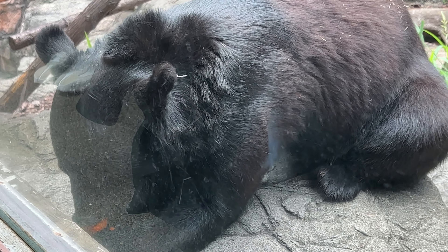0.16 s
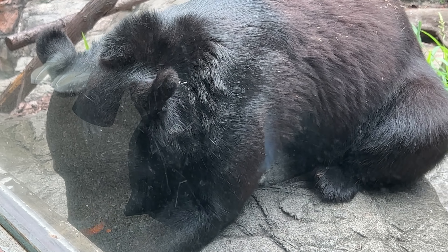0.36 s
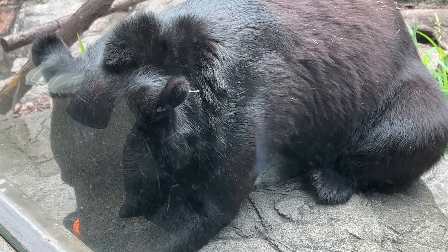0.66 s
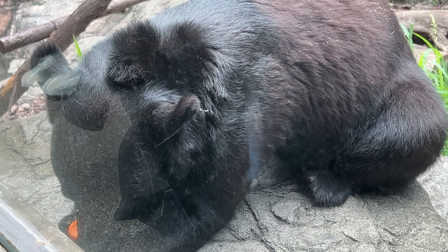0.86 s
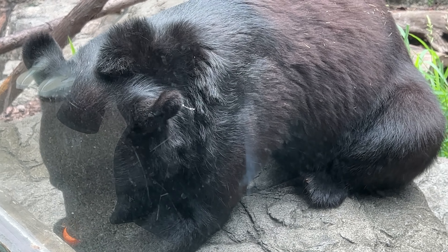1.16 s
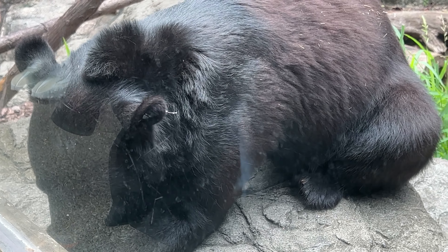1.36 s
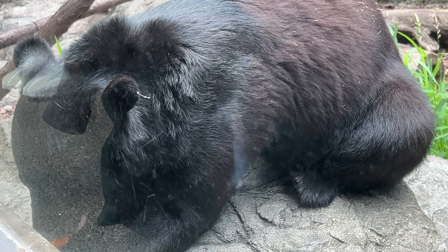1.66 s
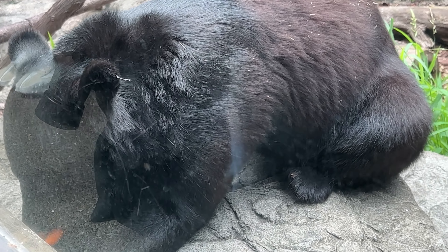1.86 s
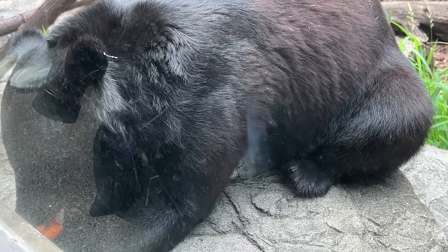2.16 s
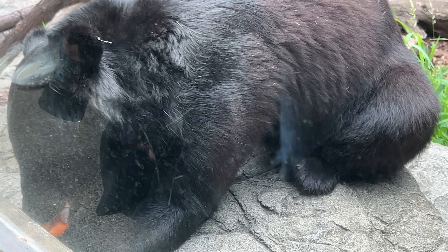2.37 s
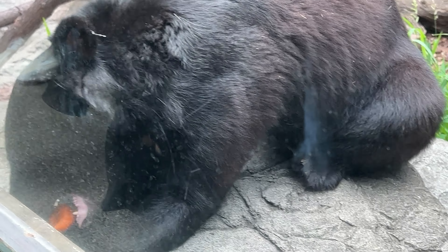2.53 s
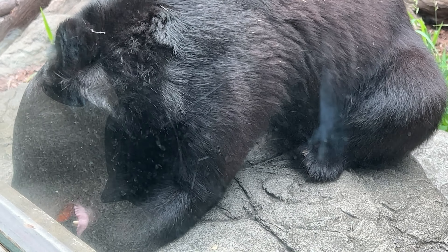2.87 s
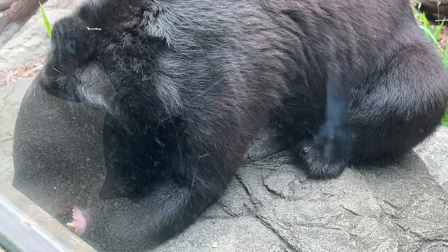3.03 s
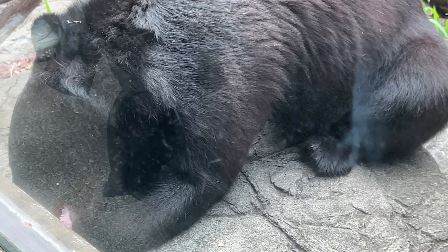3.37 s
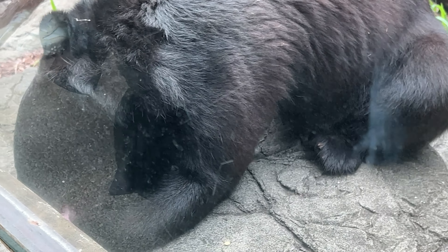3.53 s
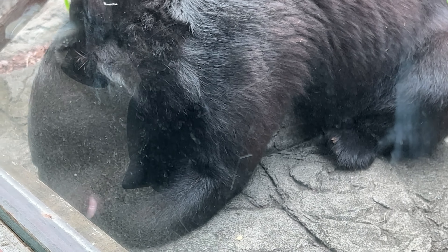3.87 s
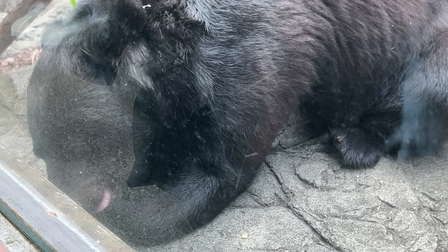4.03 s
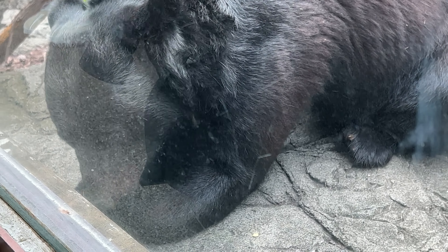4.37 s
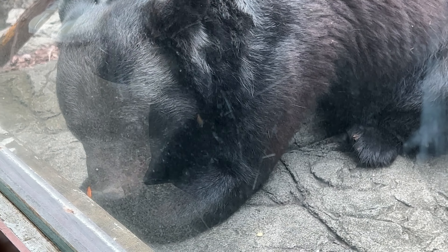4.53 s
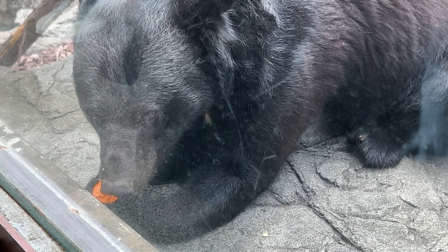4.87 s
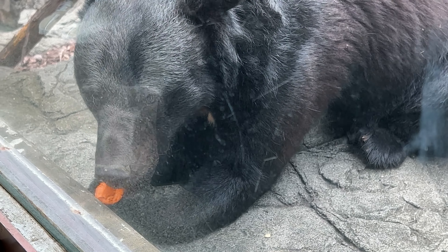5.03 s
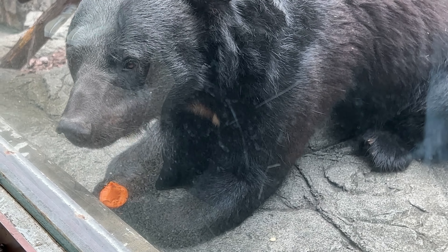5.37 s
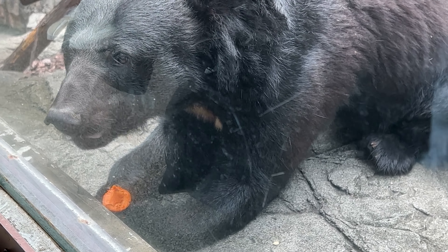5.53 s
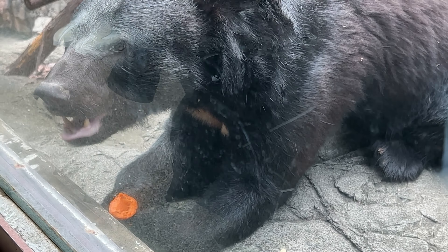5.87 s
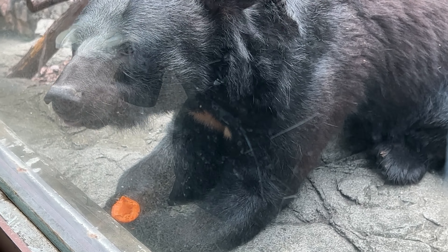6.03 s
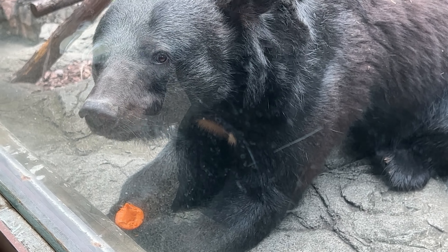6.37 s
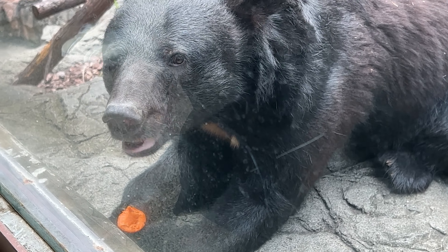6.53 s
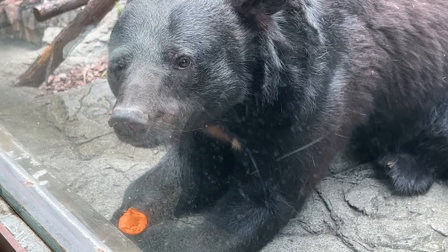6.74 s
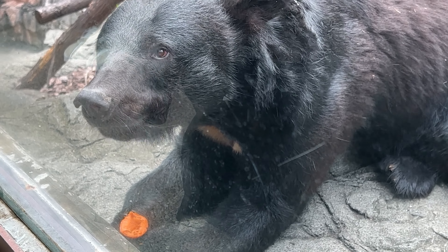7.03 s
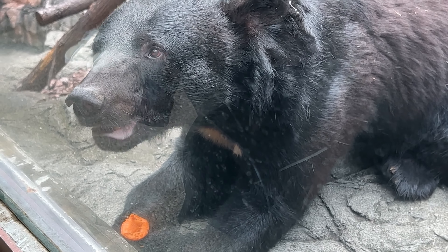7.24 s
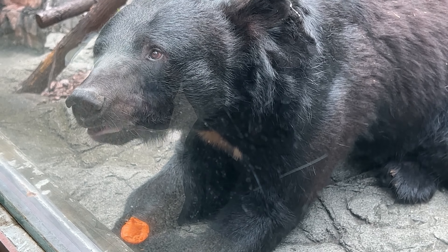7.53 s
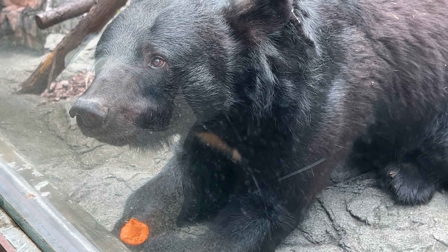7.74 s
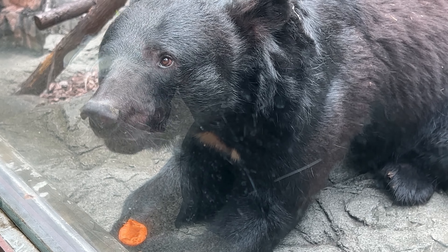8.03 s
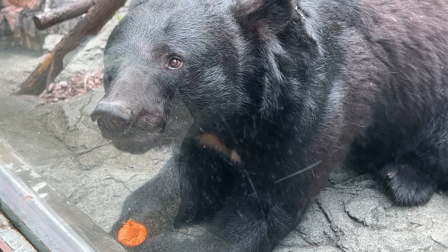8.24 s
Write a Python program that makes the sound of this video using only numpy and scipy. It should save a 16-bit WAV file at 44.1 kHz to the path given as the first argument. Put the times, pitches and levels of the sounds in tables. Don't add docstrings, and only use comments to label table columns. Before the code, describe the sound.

Stereo microphones in a hall capture a deep, constant machine hum with faint fan tones behind it. A tiny far squeak, dry clicks and soft buzzing cicada calls come and go. The machine then stops suddenly with low bumps, a brief cover rattle, small metallic pings and a cluster of rough air puffs. The remainder is quiet: soft room rush, high insect hiss, wavering whistles and longer cicada notes.

```python
import sys
import numpy as np
from scipy import signal
from scipy.fft import rfft, irfft
from scipy.io import wavfile

SR = 44100
rng = np.random.default_rng(int(sys.argv[2]) if len(sys.argv) > 2 else 0)


def to_wav(s):
    ch = np.atleast_2d(s).T
    pcm = np.round(np.clip(ch, -1, 1) * 32767)
    wavfile.write(sys.argv[1], SR, pcm.astype(np.int16))


def convert_level_to_amplitude(level_db):
    exponent = np.asarray(level_db, float) / 20
    return 10 ** exponent


N = 370440
T = np.arange(N) / SR
HZ = np.maximum(np.arange(N // 2 + 1) * SR / N, 1)
CUT_OUT_S = 5.375


def rms_one(x):
    return x / np.sqrt(np.mean(x ** 2) + 1e-20)


def in_time(rows):
    s, *columns = np.transpose(rows)
    return [np.interp(T, s, column) for column in columns]


def at_hz(points):
    hz, value = np.transpose(points)
    return np.interp(np.log(HZ), np.log(hz), value)


def window(s, length, fade=0.032):
    return np.clip(np.minimum(T - s, s + length - T) / fade, 0, 1)


def swell(s, db, hold, rise, fall):
    early = np.maximum(s - T, 0)
    late = np.maximum(T - s - hold, 0)
    return convert_level_to_amplitude(db - rise * early - fall * late)


def drift(rate):
    step = 40
    r = np.exp(-2 * np.pi * step * rate / SR)
    draws = rng.standard_normal(N // step + 2002)
    slow = signal.lfilter([1], [1, -2 * r, r * r], draws)[2000:]
    return np.interp(np.arange(N) / step, np.arange(len(slow)), rms_one(slow))


def peaks(rows):
    power = 0
    for hz, width, db in rows:
        power = power + convert_level_to_amplitude(2 * db) / (1 + ((HZ - hz) / (0.41 * width)) ** 2) ** 2
    return np.sqrt(power)


# frequency in Hz, likeness from 0 to 1.
EAR_LIKENESS = [(25, .999), (70, .997), (130, .96), (290, .6), (640, .2), (1000, .1), (1500, .35),
                (2000, .97), (3500, .92), (6000, .99), (8000, .94), (16000, .94)]
# frequency in Hz, left-right difference in dB.
EAR_LEAN = [(200, 0), (700, 1.5), (1400, -2.5), (2100, 1.5), (16000, -0.5)]


def diffuse(gain):
    alike = np.clip(at_hz(EAR_LIKENESS), 0, 1)
    mid, side = rfft(rng.standard_normal((2, N)))
    both = np.sqrt(1 + alike) * mid + np.sqrt(1 - alike) * side * [[1], [-1]]
    lean = convert_level_to_amplitude(at_hz(EAR_LEAN) * [[.5], [-.5]])
    return rms_one(irfft(both * gain * lean, N))


def tone(cycles, db, lean_db=0, lead=0):
    phase = 2 * np.pi * (cycles + rng.random()) + np.array([[lead / 2], [-lead / 2]])
    lean = convert_level_to_amplitude(lean_db * np.array([[.5], [-.5]]))
    return np.sqrt(2) * convert_level_to_amplitude(db) * lean * np.sin(phase)


def struck(rows):
    out, age = np.zeros(N + SR), T[:SR]
    for s, hz, db, swell_s, t60 in rows:
        start = int(s * SR)
        envelope = convert_level_to_amplitude(db - 60 * age / t60) * (1 - np.exp(-age / swell_s))
        out[start:start + SR] += envelope * np.sin(2 * np.pi * hz * age)
    return out[:N]


def sung(s, length, start, end, db):
    peak = .6
    share = np.clip((T - s) / length, 0, 1)
    arch_db = 12 * ((share - peak) / peak) ** 2
    pitch = start + (end - start) * np.sin(share * np.pi / 2)
    return pitch, convert_level_to_amplitude(db - arch_db) * window(s, length)


# frequency in Hz, level in dB, left-right difference in dB.
MAINS_HUM = [(99.81, -24.3, -.3), (199.8, -55, 2)]
# multiple of its speed, level in dB, left-right difference in dB,
# left ear's lead in radians.
SHAFT_ORDERS = [(3, -47, 0, 0.1), (5, -62, 2, -0.1), (6, -48, -4, -0.2), (7, -63, -1, -0.1),
                (9, -46, -6, 0.9), (10, -57, 1, -0.1), (11, -59, -7, 1.1), (12, -39, -4, 0.2),
                (13, -58, -3, 0.6), (14, -58, 3, 0.4), (15, -58, -2, 1.6), (16, -61, 10, -0.4),
                (18, -63, 16, 0.0), (20, -66, 14, -1.4), (23, -67, 0, -1.4), (24, -61, -3, -2.7),
                (26, -66, 0, 0.6), (27, -67, -9, 1.3)]
# frequency in Hz,
# level in dB, left-right difference in dB.
HOUSING_TONES = [(48.1, -61, 0), (76.7, -53, 0), (128.5, -63, 0), (246.7, -63, 0), (320.2, -53, 5),
                 (393.7, -63, 0), (587.7, -60, -12), (489.6, -63, 8)]
# frequency in Hz, level in dB per Hz.
RUMBLE_COLOUR = [(15, -55), (28, -30), (45, -8), (62, 0), (100, -8), (130, -9.5), (170, -7), (260, -16),
                 (400, -17), (700, -25.5), (1100, -37), (1600, -73)]
# time in seconds, level in dB, hold in seconds, rise and fall in dB per second.
LURCH = (5.5, -32.5, -0.03, 115, 40)
# frequency in Hz, width in Hz, level in dB.
COVER_MODES = [(174, 58, 1), (259, 62, -2), (339, 67, -7), (486, 95, -8.5), (890, 620, -25)]
# time in seconds, level in dB, hold in seconds,
# rise and fall in dB per second.
COVER_RATTLE = (5.5, -43.5, 0.4, 130, 9)


def compressor():
    off = np.maximum(T - CUT_OUT_S, 0)
    speed = np.maximum(1 - 1.75 * off, 0)
    wobble = 0.00021 + 0.047 * (1 - speed)
    shaft_hz = 24.487 * speed
    turns = np.cumsum(shaft_hz * (1 + wobble * drift(11))) / SR
    shaft = sum(tone(k * turns, db + .5 * drift(1.3), lean, lead) for k, db, lean, lead in SHAFT_ORDERS)
    housing = sum(tone(hz * T, db + 0.69 * drift(5.8), lean) for hz, db, lean in HOUSING_TONES)
    shaft_fade = convert_level_to_amplitude(0.53 - 520 * np.minimum(off, 1) ** 2)

    mains = sum(tone(hz * T, db + 0.14 * drift(3.8), lean, .07) for hz, db, lean in MAINS_HUM)
    beating_db = 3.5 * (np.cos(2 * np.pi * 14.4 * off) - np.exp(-off / .05))
    mains_fade = swell(CUT_OUT_S, 0, 0.061, 0, 73) * convert_level_to_amplitude(beating_db)

    running = swell(CUT_OUT_S, -52, 0, 0, LURCH[-1])
    rumble = (running + swell(*LURCH)) * diffuse(convert_level_to_amplitude(at_hz(RUMBLE_COLOUR)))
    settling = swell(6.2, 0, 0, 0, 56)
    rattle = swell(*COVER_RATTLE) * settling * convert_level_to_amplitude(0.81 * drift(25)) * diffuse(peaks(COVER_MODES))
    return shaft_fade * (shaft + housing) + mains_fade * mains + rumble + rattle


# time in seconds, rms level in dB, hold in seconds,
# rise and fall in dB per second.
MOUNT_SHUDDER = (5.545, -25, .075, 190, 240)
# start in seconds, frequency in Hz, peak in dB, swell in seconds,
# 60 dB decay in seconds.
MOUNT_BUMPS = [
    (5.64, 67.6, -27, .02, .3),
    (5.39, 210, -27, .03, 0.25),
    (5.505, 75.3, -11.5, 0.013, 0.15),
    (5.82, 60, -32, .03, 0.39),
    (5.96, 70, -36, .02, .2),
    (6.37, 59, -31, 0.044, 0.49),
    (4.1, 50, -40, .03, .3),
    (8.2, 60, -38, 0.028, 0.34),
]
# start in seconds, frequency in Hz, peak in dB.
PIPE_PINGS = [(5.385, 1660, -36), (5.443, 1665, -34), (5.665, 1650, -36), (5.65, 1180, -40),
              (5.882, 1665, -32), (5.885, 1150, -42), (5.385, 2420, -46), (5.62, 4900, -44),
              (5.62, 2800, -46), (5.745, 6150, -41), (5.66, 5800, -43)]


def mounts():
    rocking_hz = 62 + 80 * np.clip(MOUNT_SHUDDER[0] - T, 0, .2)
    shudder = swell(*MOUNT_SHUDDER) * tone(np.cumsum(rocking_hz) / SR, 0)
    pings = []
    for s, hz, db in PIPE_PINGS:
        t60 = .075 * max(1660 / hz, 1) ** 2
        pings.append((s, hz, db, .008, t60))
    return shudder + struck(MOUNT_BUMPS) + struck(pings) * convert_level_to_amplitude([[-2.5], [1.5]])


# frequency in Hz, level in dB per Hz.
LEAK_HISS = [(7000, -27.5), (9500, -14), (11000, 9), (13000, -0.5), (15500, 8), (17000, -13.5)]
# frequency in Hz, level in dB per Hz.
PUFF_BREATH = [(290, -35), (500, -5), (728, -14), (1170, -8.5), (1310, -14), (1640, -12.5), (2040, -18),
               (5910, -14.5), (10000, -18), (13000, -26), (22000, -120)]
# frequency in Hz, width in Hz, level in dB.
PIPE_MODES = [(1210, 79, -1), (1640, 92, 0), (2460, 100, -2), (2690, 46, -1), (4090, 51, 1.5),
              (4910, 120, -9), (5820, 32, 2), (6660, 56, -4), (6900, 29, -8), (7320, 110, -26),
              (8100, 100, -11), (8860, 31, -19)]
# time in seconds, level in dB, hold in seconds, rise in dB per second.
VALVE_PUFFS = [
    (5.393, -54.5, .06, 1000),
    (5.49, -51.5, 0.033, 160),
    (5.586, -57.5, 0.015, 300),
    (5.662, -44, 0.0098, 260),
    (5.752, -48, 0.011, 250),
    (5.887, -44.5, 0.017, 702),
]
# time in seconds, level in dB, hold in seconds,
# rise and fall alike in dB per second.
AIR_WISPS = [
    (6.22, -70, .01, 302),
    (6.38, -77, .02, 300),
    (6.8, -76.5, 0.29, 62),
    (7.45, -75, .15, 59),
    (7.9, -77, 0.28, 60),
]


def valve():
    flow = sum(swell(*puff, 198) for puff in VALVE_PUFFS)
    brightness = (flow / convert_level_to_amplitude(-44)) ** .4
    thin = swell(CUT_OUT_S, -67.5, 0, 0, 58) + convert_level_to_amplitude(-8) * flow * brightness
    flutter = drift(9.6)
    thin += sum(swell(*wisp, wisp[-1]) for wisp in AIR_WISPS) * convert_level_to_amplitude(2 * flutter)
    leak = thin * convert_level_to_amplitude(3.5 + .5 * flutter) * diffuse(convert_level_to_amplitude(at_hz(LEAK_HISS)))
    puffs = convert_level_to_amplitude(5.0 + 2.14 * drift(80)) * diffuse(convert_level_to_amplitude(at_hz(PUFF_BREATH)))
    pipe = convert_level_to_amplitude(-7.0 + 3.5 * drift(35)) * diffuse(peaks(PIPE_MODES))
    return leak + flow * (puffs + pipe)


# time in seconds, first fan in Hz, second fan in Hz.
BLADE_RATES = [(0, 691.5, 684.6), (2.2, 691.4, 685.3), (3.3, 690.7, 683.6), (4.8, 693, 686),
               (8.4, 694.6, 686.7)]
# levels of the first, second and third overtone in dB.
BLADE_TONES = [(-66, -60.5, -67), (-69.5, -60.5, -76.5)]
# fan, overtone (both from 0),
# time in seconds, change in dB, width in seconds.
STANDING_WAVES = [(0, 0, 2.9, -7, .6), (0, 1, 5.3, -13, 1.4), (0, 2, 8.2, 7, 1.8), (1, 0, 7.6, -7, 1.3),
                  (1, 1, 5.2, -11, 1.8), (1, 2, 3.5, 12, .9), (0, 1, 1.9, -4, .3), (1, 1, 3.2, -4, .3),
                  (0, 1, 7.8, -4, 1.5), (1, 1, 7.8, -4, 1.5)]


def fans():
    out = 0
    for fan, hz in enumerate(in_time(BLADE_RATES)):
        db = list(BLADE_TONES[fan])
        for which, k, s, change_db, width in STANDING_WAVES:
            if which == fan:
                db[k] = db[k] + change_db * np.exp(-((T - s) / width) ** 2)
        cycles = np.cumsum(hz + .25 * drift(2.5)) / SR
        out = out + tone(cycles, db[0] + 2.8 * drift(3.0), 9, 0.89)
        out = out + tone(2 * cycles, db[1] + .8 * drift(3), -3, -.4)
        out = out + tone(3 * cycles, db[2] + 1.6 * drift(2.2))
    return out


# start in seconds, length in seconds, tymbal clicks per second at start and at end,
# level in dB.
CICADA_NOTES = [
    (1.0, .47, 185, 202, -62),
    (1.57, .19, 192.3, 192.3, -71),
    (1.95, .22, 193, 195, -65),
    (2.42, .31, 187.8, 186, -65),
    (3.03, .27, 180.5, 180.5, -68),
    (6.15, .63, 184.5, 205.5, -64),
    (7.14, .22, 194.5, 195.5, -63),
    (7.5, .36, 196.5, 193.5, -64),
    (8.1, .2, 197, 195, -78),
]
# frequency in Hz, shift in Hz per extra click per second,
# width in Hz, level in dB.
ABDOMEN_MODES = [(4520, 9, 220, -5.5), (5060, 24, 560, -5)]


def cicada():
    rates, gains = np.transpose([sung(*note) for note in CICADA_NOTES], (1, 0, 2))
    rate = rates[np.argmax(gains, axis=0), np.arange(N)]
    effort = rate - 192
    cycles = np.cumsum(rate * (1 + 0.00154 * drift(14.2))) / SR
    out = np.zeros(N)
    for k in range(20, 32):
        gain = 0
        for hz, stretch, width, top_db in ABDOMEN_MODES:
            detune = k * rate - hz - stretch * effort
            gain = gain + convert_level_to_amplitude(top_db) / (1 + (2 * detune / width) ** 2)
        flicker = convert_level_to_amplitude(3.8 * drift(19))
        out += gain * flicker * np.sin(2 * np.pi * (k * cycles + rng.random()))
    return np.sqrt(2) * gains.sum(axis=0) * out


# time in seconds, level in dB, hold in seconds,
# rise and fall in dB per second.
LOWER_VISIT = (3.5, -51, 0, 9, 1)
# frequency in Hz, level in dB per Hz.
UPPER_VOICES = [(5200, -34), (5900, -9.5), (6500, -10), (7300, -2), (8600, 1.5), (9500, -8), (10400, -16),
                (11500, -29), (13000, -37)]
# frequency in Hz, level in dB per Hz.
LOWER_VOICES = [(5300, -33.5), (5900, -23), (6600, 7), (7300, -8), (8200, -29)]
# start in seconds, length in seconds, frequency in Hz at start and at end,
# level in dB.
FAR_WHISTLES = [
    (6.6, .6, 6180, 6290, -67.5),
    (7.1, .8, 6280, 6540, -71),
    (7.25, 1.4, 5820, 5950, -67),
    (1.2, .7, 6130, 6100, -72),
    (-.5, 1.2, 6150, 6020, -72),
]


def insects():
    out = convert_level_to_amplitude(-54 + 1.5 + 0.23 * drift(3)) * diffuse(convert_level_to_amplitude(at_hz(UPPER_VOICES)))
    out += swell(*LOWER_VISIT) * convert_level_to_amplitude(-9.5 + 0.88 * drift(5.2)) * diffuse(convert_level_to_amplitude(at_hz(LOWER_VOICES)))
    for note in FAR_WHISTLES:
        hz, gain = sung(*note)
        out += gain * tone(np.cumsum(hz + 32 * drift(60)) / SR, 3 * drift(30))
    return out


# start in seconds, length in seconds, frequency in Hz at start and at end,
# level in dB.
FAR_SQUEAK = [
    (2.8, .19, 1035, 1125, -57),
]


def squeak():
    hz, gain = sung(*FAR_SQUEAK[0])
    return gain * tone(np.cumsum(hz) / SR, 2.7 * drift(25))


# start in seconds, peak in dB, lowest frequency in Hz.
DRY_TICKS = [
    (.005, -42, 9000),
    (1.228, -41, 10000),
    (1.9, -55, 9000),
    (3.893, -44, 2500),
    (4.09, -53, 9000),
]


def ticks():
    out = np.zeros(N)
    for s, db, low_hz in DRY_TICKS:
        decay = convert_level_to_amplitude(db - 60 * np.maximum(T - s, 0) / .04) * (T >= s)
        highpass = signal.butter(2, low_hz, "high", fs=SR, output="sos")
        out += signal.sosfilt(highpass, decay * rng.standard_normal(N))
    return out


# frequency in Hz, level in dB per Hz.
HALL_AIR = [(15, -46), (25, -12), (86, 1.5), (144, -9), (332, -16), (476, -12), (746, -18.5), (956, -16.5),
            (1280, -23.5), (1400, -23), (1500, -23.5), (1960, -27), (2100, -27.5), (2400, -29),
            (5400, -35.5), (7020, -47), (11900, -120)]


def hall():
    return convert_level_to_amplitude(-42 + .5 * drift(8.1)) * diffuse(convert_level_to_amplitude(at_hz(HALL_AIR)))


def scene():
    machine = compressor() + mounts() + valve()
    return machine + fans() + cicada() + insects() + squeak() + ticks() + hall()


def top_cut(x):
    return signal.sosfilt(signal.butter(12, 17090, fs=SR, output="sos"), x)


# frequency in Hz, left port's lead in radians.
MICROPHONE_PORTS = [(0, 0), (2100, 0), (3200, -.55), (6500, 0), (8100, -.8), (8850, 0), (10600, 3.14),
                    (12300, 6.28), (14000, 9.42), (15700, 12.57), (17000, 15)]


def record(dry):
    dry = dry * np.clip(np.minimum(T, T[-1] - T) / .002, 0, 1)
    lead = np.interp(HZ, *np.transpose(MICROPHONE_PORTS))
    band = (HZ < 15800) / np.sqrt(1 + (38 / HZ) ** 6)
    turned = irfft(rfft(dry) * np.exp(.5j * lead * [[1], [-1]]) * band, N)
    return top_cut(turned)


dry = scene()
out = record(dry)
to_wav(out)
```